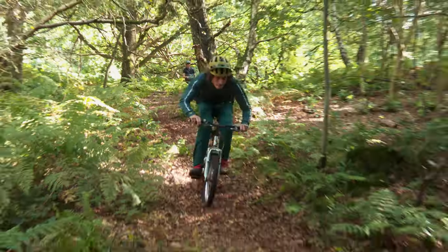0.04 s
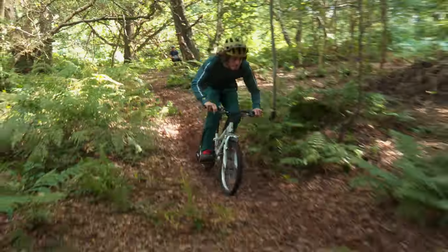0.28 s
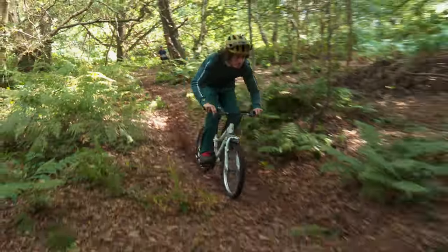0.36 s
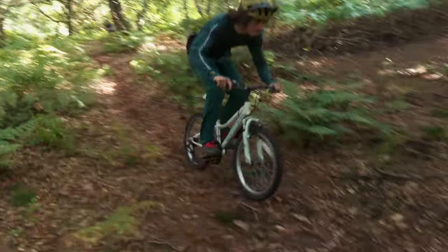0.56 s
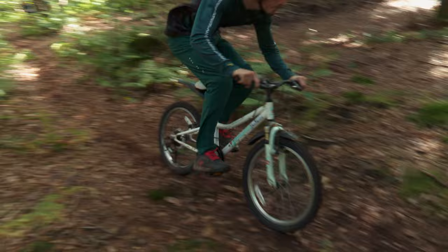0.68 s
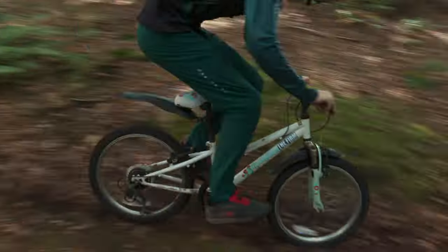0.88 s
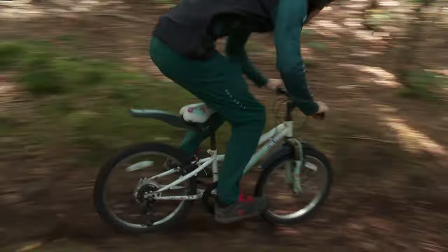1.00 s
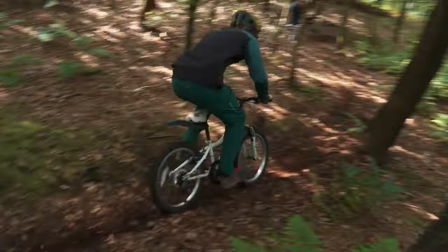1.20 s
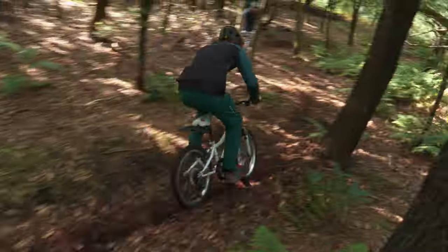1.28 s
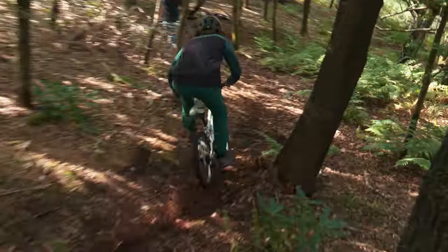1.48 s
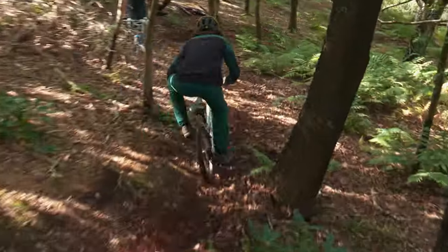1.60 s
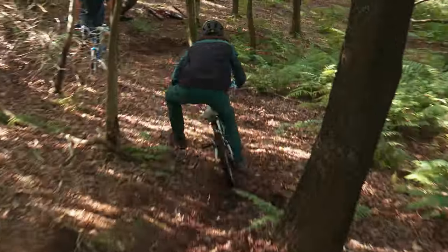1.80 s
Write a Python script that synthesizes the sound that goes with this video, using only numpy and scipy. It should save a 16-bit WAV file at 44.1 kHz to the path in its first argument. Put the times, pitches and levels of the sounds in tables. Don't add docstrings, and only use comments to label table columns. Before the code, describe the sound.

A small bicycle approaches over dry leaves, faint crackling growing to loud hiss, twig snaps and wheel bumps close to the microphone, then recedes with rapid freewheel ticking in a quiet wood.

```python
import sys
import numpy as np
from scipy import signal
from scipy.fft import rfft, irfft
from scipy.io import wavfile
from scipy.ndimage import uniform_filter1d

SR = 44100
rng = np.random.default_rng(int(sys.argv[2]) if len(sys.argv) > 2 else 0)


def wrap_up_sound(samples):
    columns = np.atleast_2d(samples).T
    tamed = np.clip(columns, -1, 1)
    steps = np.round(tamed * 32767).astype(np.int16)
    wavfile.write(sys.argv[1], SR, steps)


def field_ratio(decibels):
    return 10 ** (np.asarray(decibels, dtype=float) / 20)


N = 81585
T = np.arange(N) / SR

# (pitch [Hz], width [Hz], level [dB])
TYRE_MODES = [(165, 93, -11), (250, 64, -2), (345, 136, -3.5), (518, 113, -3.5), (723, 156, -0.5),
              (1320, 67, -1), (1565, 100, -1.5)]


def evened(x):
    return x / np.sqrt(np.mean(x ** 2) + 1e-20)


def level_at(times, db):
    return field_ratio(np.interp(T, times, db))


def coloured_noise(points):
    f, db = np.transpose(points)
    hz = np.fft.rfftfreq(N, 1 / SR)
    shape = field_ratio(np.interp(np.log(hz + 1), np.log(f + 1), db))
    return evened(irfft(rfft(rng.standard_normal(N)) * shape, N))


def add(mix, s, sound):
    part = mix[round(s * SR):][:len(sound)]
    part += sound[:len(part)]


def high_pass(x, order, hz):
    return signal.sosfilt(signal.butter(order, hz, "high", fs=SR, output="sos"), x)


def resonate(x, hz, width):
    b, a = signal.iirpeak(min(hz, .45 * SR), hz / max(width, 5), SR)
    return signal.lfilter(b, a, x)


def body(x, modes):
    total = 0
    for k, (hz, width, db) in enumerate(modes):
        total = total + (-1) ** k * field_ratio(db) * resonate(x, hz, width)
    return evened(total)


def clicks(per_s, spread_db):
    u = rng.random(N)
    excess = rng.exponential(1, N)
    sign = rng.choice([-1., 1.], N)
    return sign * field_ratio(spread_db * np.minimum(excess, 4)) * (u < per_s / SR)


def slow(hz):
    low = signal.butter(3, hz, fs=SR, output="sos")
    x = signal.sosfilt(low, rng.standard_normal(N + SR // 2))
    return np.clip(evened(x[-N:]), -2, 2)


def grains(train, lo_hz, hi_hz, cycles, count=16):
    pick = rng.integers(0, count, N)
    out = np.zeros(N)
    for k, hz in enumerate(np.geomspace(lo_hz, hi_hz, count)):
        p = np.arange(600) / SR * hz
        wavelet = np.sin(2 * np.pi * p) * np.exp(-p / cycles) * np.sqrt(hz)
        out += signal.oaconvolve(train * (pick == k), wavelet)[:N]
    return evened(out)


def quiet_wood():
    # (frequency [Hz], level [dB per Hz])
    wood_points = [(18, -66), (30, -7), (264, 50), (424, 18), (581, -9.5), (1570, -73), (1990, -71),
                   (6830, 13), (15800, 33)]
    return field_ratio(-60.5) * coloured_noise(wood_points)


def trees(x):
    echo_db, echo_t60_s = -14, .14
    t = np.arange(6000) / SR
    sparse = rng.standard_normal(6000) * (rng.random(6000) < .05)
    scatter = sparse * field_ratio(-60 * t / echo_t60_s) * (t > .003)
    return field_ratio(echo_db) * signal.oaconvolve(x, scatter / np.linalg.norm(scatter))[:N]


def freewheel():
    # (time [s], teeth passed [count])
    pawl_turns = [(.45, -38), (.8857, 0), (.941, 5), (.957, 6), (.981, 8), (1.003, 10), (1.029, 13),
                  (1.0387, 14), (1.0515, 15), (1.1374, 23), (1.1495, 24), (1.1816, 26), (1.1944, 27),
                  (1.2053, 28), (1.2442, 31), (1.2873, 35), (1.3242, 38), (1.403, 44), (1.4175, 45),
                  (1.439, 47), (1.4625, 48), (1.481, 49), (1.495, 50), (1.5035, 51), (1.5185, 52),
                  (1.5315, 53), (1.5855, 60), (1.6065, 63), (1.6335, 66), (1.669, 69), (1.6883, 70),
                  (1.7097, 71), (1.739, 73), (1.7814, 77), (1.8336, 81)]
    # (time [s], rattle level [dB], hub shell ring level [dB])
    pawl_levels = [(.45, -54, -60), (.8, -44, -54), (1.0, -39.5, -52), (1.28, -40.5, -52),
                   (1.4, -43.5, -51), (1.5, -48, -47), (1.56, -49.5, -43), (1.69, -50, -43.5),
                   (1.72, -52, -54), (1.85, -52, -58)]
    # (pitch [Hz], width [Hz], level [dB])
    hub_modes = [(4500, 1200, -9), (6300, 900, -2), (8800, 1400, -4), (10900, 1600, 0), (15400, 600, -3)]
    tick_s, tick_spread_db = .0032, 1.5
    shell_hz, shell_rise_hz_per_s, shell_t60_s = 6700, 1500, .011

    s, teeth = np.transpose(pawl_turns)
    tooth = np.arange(teeth[0], teeth[-1] + 1)
    draw = rng.standard_normal((len(tooth), 4))
    at = np.interp(tooth, teeth, s) + .0003 * draw[:, 0]
    size = field_ratio(tick_spread_db * draw[:, 1])
    t = np.arange(800) / SR

    train = np.zeros(N)
    train[(at * SR).astype(int)] = size
    tick = np.minimum(t / tick_s / .2, 1) * np.exp(-(t / tick_s) ** 3)
    rattle = signal.oaconvolve(train, tick)[:N] * body(rng.standard_normal(N), hub_modes)

    ring = np.zeros(N)
    fall = np.minimum(t / .001, 1) * field_ratio(-60 * t / shell_t60_s + 4)
    for start, a, detune in zip(at, size * field_ratio(0.91 * draw[:, 3]), draw[:, 2]):
        hz = (shell_hz + shell_rise_hz_per_s * max(start - 1.6, -.3)) * (1 + .02 * detune)
        add(ring, start, a * fall * np.sin(2 * np.pi * hz * t))

    s, rattle_db, ring_db = np.transpose(pawl_levels)
    return level_at(s, rattle_db) * rattle + level_at(s, ring_db) * ring


def thud(peak_db, hz, t60, noise):
    t = np.arange(len(noise)) / SR
    fall = field_ratio(-60 * t / t60) * np.minimum(t * hz / 1.1, 1)
    note = 0.86 * np.sin(2 * np.pi * hz * t)
    rough = 0.44 * evened(resonate(noise, hz, 0.25 * hz))
    return field_ratio(peak_db - 4) * fall * (note + rough + 0.29 * body(noise, TYRE_MODES))


def bumps():
    # (time [s], peak level [dB], pitch [Hz], ring t60 [s])
    wheel_bumps = [(0.023, -54, 510, 0.056), (0.035, -47, 570, 0.087), (0.089, -43, 522, 0.077),
                   (0.126, -45, 690, 0.077), (0.1913, -31, 640, 0.075), (0.229, -36, 262, 0.095),
                   (0.263, -36.5, 653, 0.045), (0.424, -40, 670, 0.044), (0.512, -42, 700, 0.07),
                   (0.531, -41.5, 329, 0.075), (0.557, -40, 729, 0.061), (0.614, -31, 636, 0.024),
                   (0.645, -33, 714, 0.035), (0.699, -34, 700, 0.03), (0.723, -37, 782, 0.07),
                   (0.773, -33, 710, 0.055), (0.83, -28, 700, 0.028), (0.887, -30, 940, 0.061),
                   (0.9415, -27, 349, 0.045), (0.991, -26, 299, 0.039), (1.082, -45, 895, 0.07),
                   (1.333, -47, 233, 0.21), (1.416, -32.5, 684, 0.047), (1.4245, -32, 270, 0.05),
                   (1.4405, -34, 500, 0.023), (1.511, -41, 243, 0.21), (1.719, -41, 640, 0.04),
                   (1.843, -36, 680, 0.05), (1.728, -42, 300, .07), (1.747, -42, 260, .1),
                   (1.776, -44, 230, .1), (1.844, -40, 300, .06), (.856, -27, 700, .03),
                   (1.428, -32, 420, .035),
                   (.2285, -38, 560, .07),
        (.9905, -32, 1400, .06),
        (1.4235, -34, 1520, .05),
        (1.477, -46, 255, .14),
    ]
    rows = wheel_bumps
    out = np.zeros(N)
    for (s, peak_db, hz, t60), noise in zip(rows, rng.standard_normal((len(rows), 5000))):
        add(out, s, thud(peak_db, hz, t60, noise))
    return out


def snap(peak_db, hz, length, octaves, noise):
    tail_db, tail_s, splinter_db = -37.5, 0.03, 2
    t = np.arange(len(noise)) / SR
    u = 2 * t / max(length, .0004)
    burst = (u * np.exp(1 - u)) ** 0.77
    tail = field_ratio(tail_db) * np.minimum(u, 1) * np.exp(-t / tail_s)
    splinters = noise * field_ratio(splinter_db * noise[::-1])
    splinters[round(length * SR / 3)] += 3.5
    edges = np.clip(hz * 2 ** (np.array([-.5, .5]) * max(octaves, .2)), 100, .46 * SR)
    band_pass = signal.butter(2, edges, "band", fs=SR, output="sos")
    band = signal.sosfilt(band_pass, (burst + tail) * splinters)
    return field_ratio(peak_db) * band / abs(band).max()


def snaps():
    # (time [s], peak level [dB], pitch [Hz], length [s], breadth [octaves])
    twig_snaps = [(0.1083, -32, 2750, .0016, 0.78), (0.135, -42, 2770, 0.0046, 0.71),
                  (0.2284, -22, 5720, 0.00081, 1.65), (.316, -32, 10600, 0.00094, 0.52),
                  (0.4172, -30, 9500, .001, 1), (0.4085, -30, 4000, 0.003, 2),
                  (0.6572, -27, 9000, 0.003, 1), (0.6132, -24, 8000, 0.0016, 1.6),
                  (0.667, -27, 8000, 0.003, 1.3), (0.738, -23.5, 9000, 0.0015, 1.2),
                  (0.84, -18.5, 9000, 0.0009, 1.2), (0.7978, -26, 10900, 0.0011, 0.55),
                  (.8466, -15, 8000, 0.0007, .8), (0.9285, -21, 6000, 0.003, 1.5),
                  (0.9397, -14, 6500, .0033, 1.8), (0.9542, -26, 1400, 0.0028, 0.6),
                  (0.9894, -12.5, 5200, .0033, 2.52), (1.0843, -27, 1390, .0028, .8),
                  (1.1376, -25.5, 5340, 0.002, 0.63), (1.417, -37, 1400, 0.0011, 0.3),
                  (1.4232, -28, 3500, 0.001, 1.5), (1.4388, -23.5, 7500, 0.0019, 2.2),
                  (1.781, -36.5, 8000, 0.0029, 1.2), (1.7535, -41, 3200, 0.0017, 1.2),
                  (1.0725, -29, 9000, .0012, 1.6), (1.0485, -30, 12000, .0008, .6),
                  (1.4582, -35, 6200, .0012, .6)]
    out = np.zeros(N)
    for (s, *snap_settings), noise in zip(twig_snaps, rng.standard_normal((len(twig_snaps), 2500))):
        add(out, s, snap(*snap_settings, noise))
    return out


def crack(peak_db, hz, t60):
    t = np.arange(3000) / SR
    note = np.sin(2 * np.pi * hz * t) * field_ratio(-60 * t / t60)
    edge = np.sin(2 * np.pi * 2.1 * hz * t) * field_ratio(-170 * t / t60)
    return field_ratio(peak_db) * (note + .8 * edge)


def cracks():
    # (time [s], peak level [dB], pitch [Hz], ring t60 [s])
    twig_cracks = [(.3257, -38, 4800, .005), (.3833, -36, 2700, .008), (.3898, -38, 2800, .005),
                   (.408, -26, 2500, .008), (.4108, -35, 3200, .006), (.4282, -31, 5500, .005),
                   (.5445, -32, 4070, .006), (.5865, -35, 1800, .006), (.6006, -30, 2600, .007),
                   (.6075, -33, 2600, .006), (.6334, -27, 2600, .009), (.6392, -30, 3400, .005),
                   (.6425, -30, 2700, .006), (.7728, -24, 2800, .008), (.7752, -27, 2900, .01),
                   (.9278, -20, 2600, .009), (.9435, -36, 3420, .09), (.9415, -19, 4950, .012),
                   (.9915, -22, 4500, .008), (.8285, -29, 1560, .012), (.8305, -26, 3800, .006),
                   (.8445, -26, 1400, .01), (.8595, -25, 4400, .006), (.8535, -24, 3600, .006),
                   (.6405, -32, 1500, .012), (.6505, -29, 1600, .01), (.9888, -27, 2300, .01),
                   (1.2047, -36, 3700, .006), (1.2255, -35, 1650, .012), (1.4233, -30, 1500, .015),
                   (1.5325, -40, 4000, .005), (1.7465, -41, 2800, .008), (1.754, -38, 1700, .008),
                   (1.843, -40, 2500, .006)]
    out = np.zeros(N)
    for s, *crack_settings in twig_cracks:
        add(out, s, crack(*crack_settings))
    return out


def tyres():
    # (time [s], crush level [dB], tyre load [dB re crush])
    roll_levels = [(0, -55.5, -11), (.3, -50, -17), (.55, -42, -14), (.7, -38.5, -16), (.8, -38.5, -19.5),
                   (1.0, -39.5, -8), (1.15, -42.5, -10), (1.3, -50.5, -6), (1.55, -51, -9),
                   (1.69, -55.5, -8), (1.85, -49, -3.5)]
    # (middle [s], half length [s], level [dB], tyre load [dB re level])
    leaf_drifts = [(0.039, 0.022, -51, -16), (0.134, 0.034, -50.5, -5.5), (.31, 0.0051, -51.5, 0.5),
                   (0.377, 0.016, -49.5, -3), (0.427, 0.018, -43, -11.5), (0.486, 0.0048, -52, -6),
                   (0.616, 0.0074, -38, -5), (0.646, 0.011, -39, -4.5), (0.742, 0.016, -38.5, -9),
                   (0.833, 0.004, -32, -8), (0.852, .012, -27.5, -9), (0.9, 0.036, -39.5, -8.5),
                   (1.104, 0.0067, -39, -32), (1.444, 0.004, -44, -6), (1.583, 0.012, -44.5, -32),
                   (1.739, 0.013, -45.5, -8.5), (1.845, 0.0076, -55.5, 0)]
    # (frequency [Hz], level [dB per Hz])
    litter_points = [(76, -21), (130, -10.5), (315, -4.5), (480, -10.5), (717, -9), (2100, -13.5),
                     (5560, -4.5), (9950, -0.5), (15800, -16)]
    hiss_db, crackle_db, prick_db, grit_db = -2.5, -5.5, -13, -5.5

    s, crush_db, load_db = np.transpose(roll_levels)
    crush = level_at(s, crush_db)
    load = crush * level_at(s, load_db)
    for middle, half, db, share_db in leaf_drifts:
        swell = field_ratio(db) * np.exp(-.5 * ((T - middle) / half) ** 2)
        crush = np.hypot(crush, swell)
        load = np.hypot(load, swell * field_ratio(share_db))

    hiss = coloured_noise(litter_points) * field_ratio(hiss_db + 1.6 * slow(40))
    crackle = field_ratio(crackle_db) * grains(clicks(2200, 3.6) * field_ratio(2.0 * slow(70)), 4200, 14000, 1.5)
    pricks = field_ratio(prick_db) * grains(clicks(120, 2.5), 4500, 12000, .8)
    grit = field_ratio(grit_db) * grains(clicks(600, 3.2), 1300, 4500, 2.5)
    small_bumps = clicks(900, 2.2) * field_ratio(1.42 * slow(28))
    drum = body(uniform_filter1d(small_bumps, 12), TYRE_MODES)
    return crush * (hiss + crackle + pricks) + load * (grit + drum)


def scene():
    struck = bumps() + snaps() + cracks()
    hits = high_pass(struck, 2, 150) + freewheel()
    return (hits + trees(hits) + tyres() + quiet_wood())[None]


def band_limit(x):
    return signal.sosfilt(signal.butter(12, 16990, fs=SR, output="sos"), x)


def record(dry):
    mic_low_hz, edge_hz = 60, 15750
    x = high_pass(dry, 3, mic_low_hz)
    top_edge = signal.firwin(511, edge_hz, window=("kaiser", 9), fs=SR)
    x = signal.oaconvolve(x, top_edge[None], "same")
    return band_limit(x)


dry = scene()
out = record(dry)
wrap_up_sound(out)
```